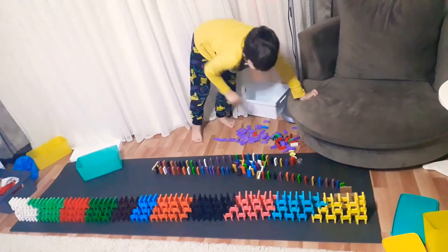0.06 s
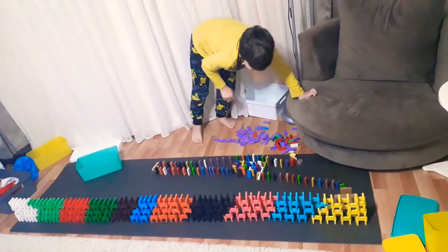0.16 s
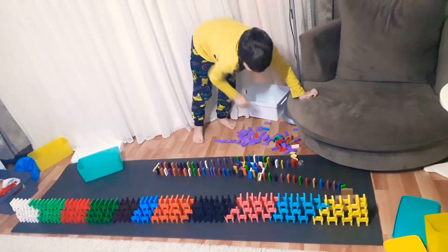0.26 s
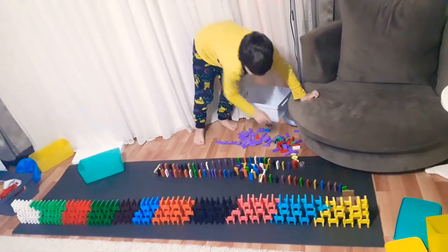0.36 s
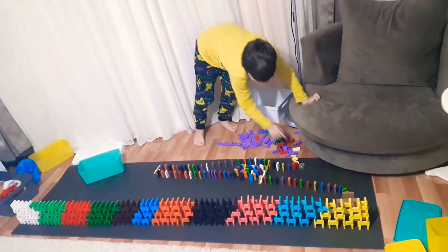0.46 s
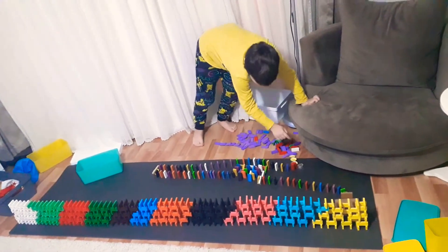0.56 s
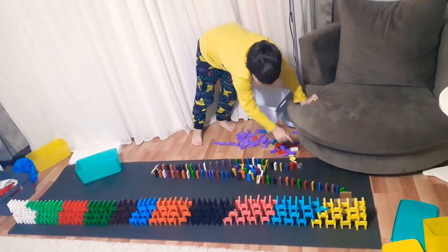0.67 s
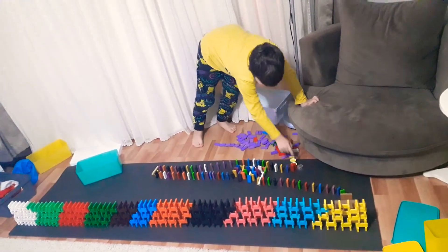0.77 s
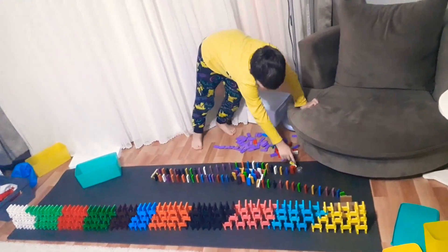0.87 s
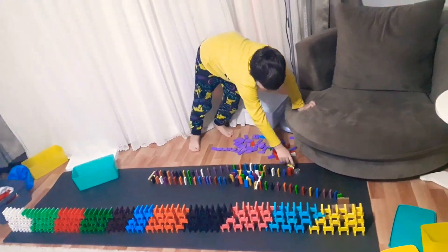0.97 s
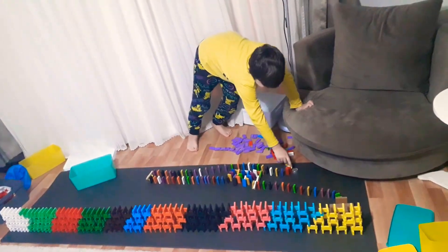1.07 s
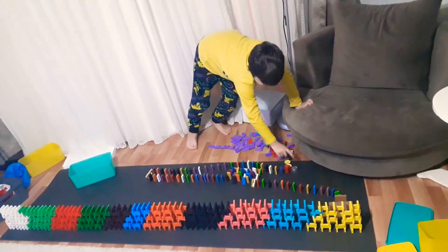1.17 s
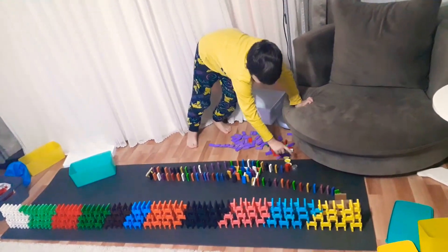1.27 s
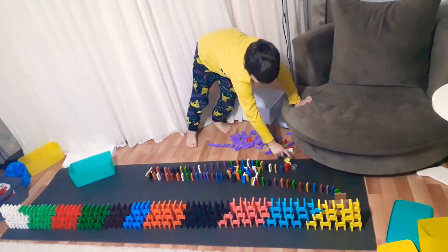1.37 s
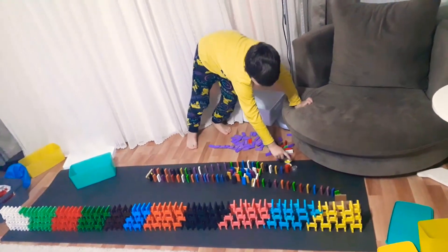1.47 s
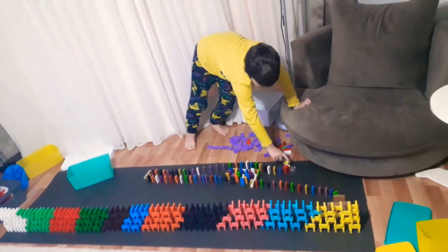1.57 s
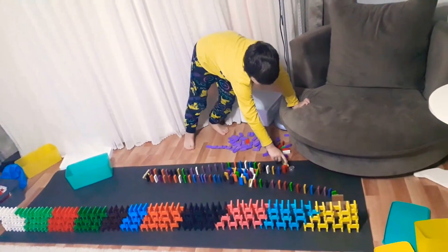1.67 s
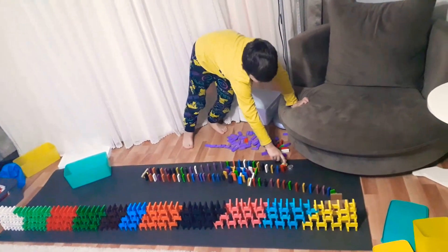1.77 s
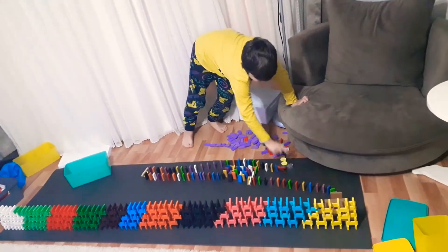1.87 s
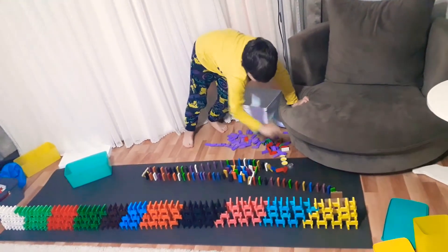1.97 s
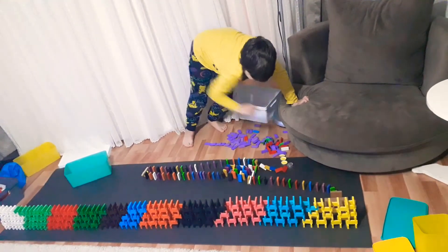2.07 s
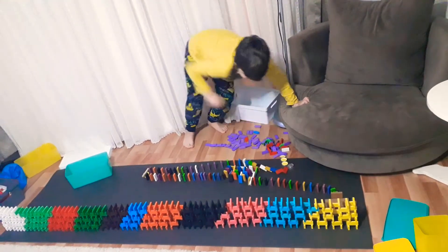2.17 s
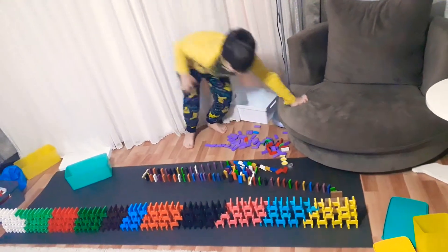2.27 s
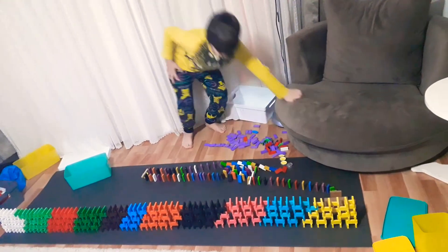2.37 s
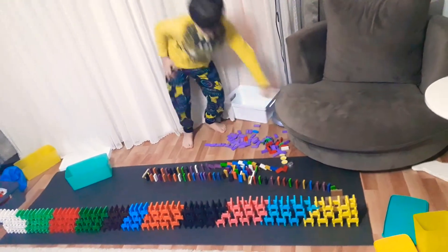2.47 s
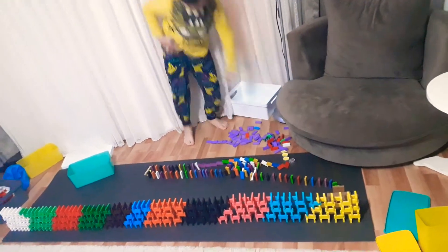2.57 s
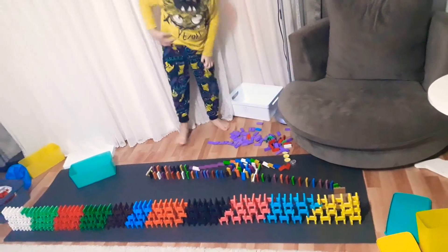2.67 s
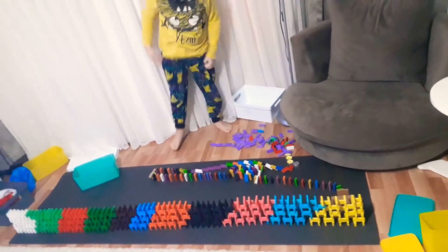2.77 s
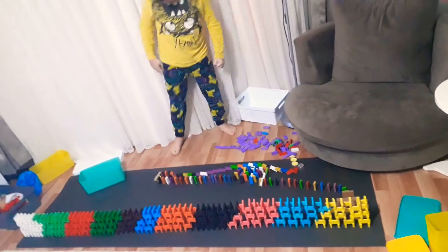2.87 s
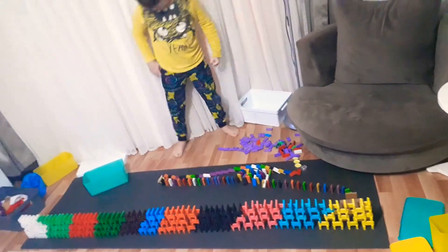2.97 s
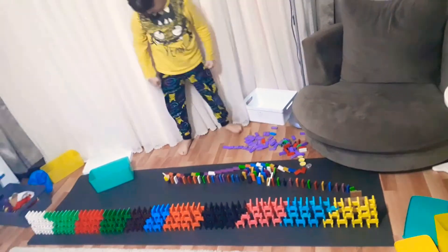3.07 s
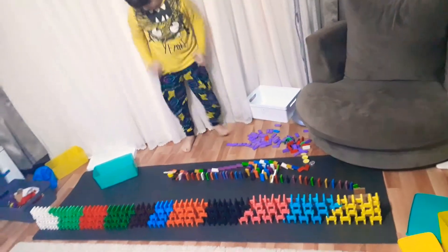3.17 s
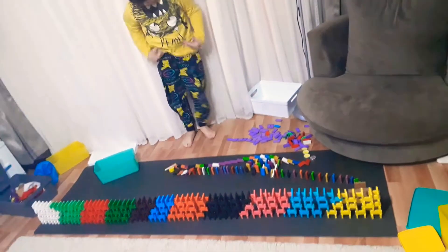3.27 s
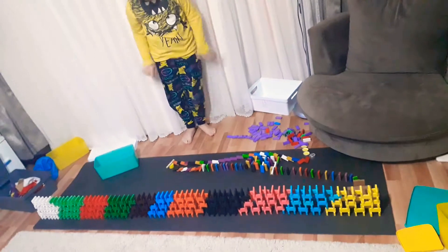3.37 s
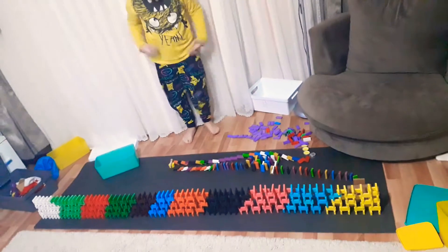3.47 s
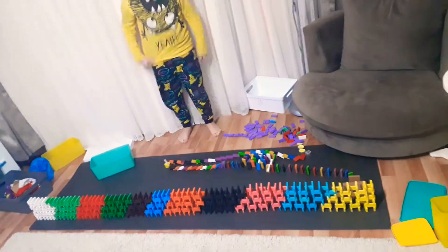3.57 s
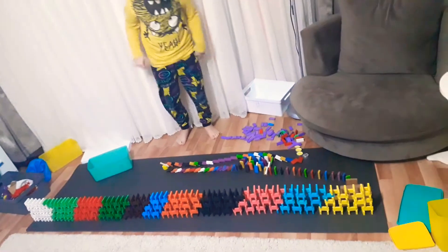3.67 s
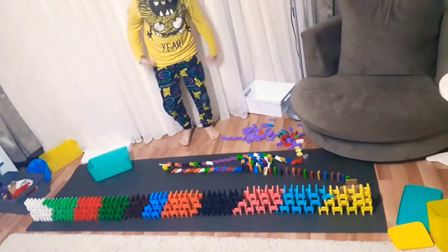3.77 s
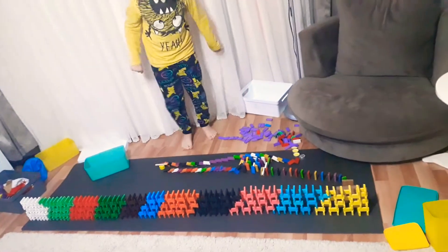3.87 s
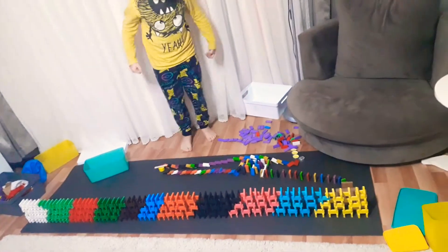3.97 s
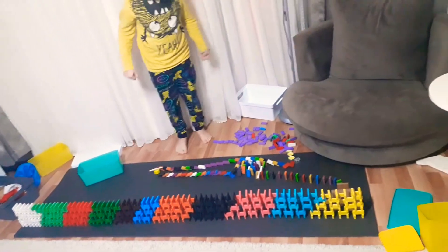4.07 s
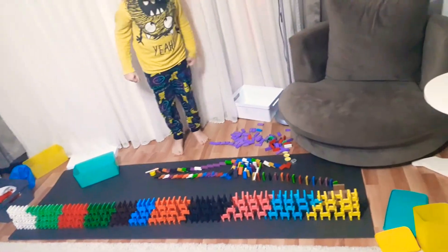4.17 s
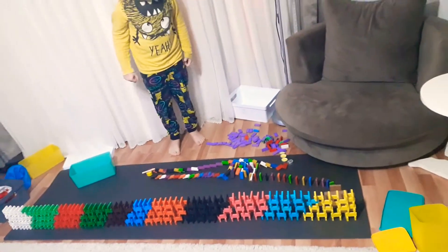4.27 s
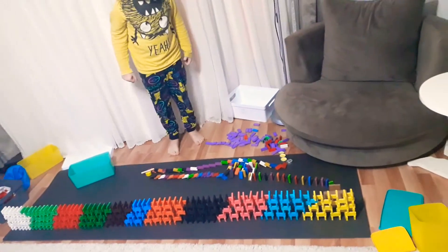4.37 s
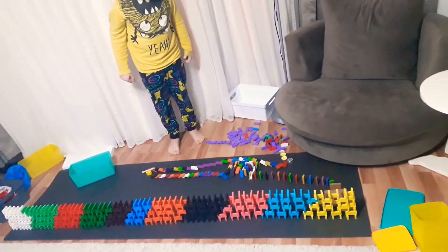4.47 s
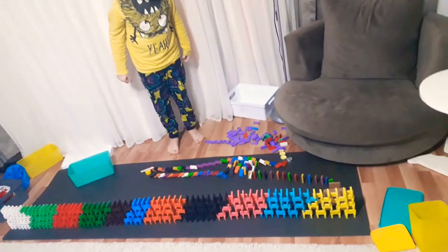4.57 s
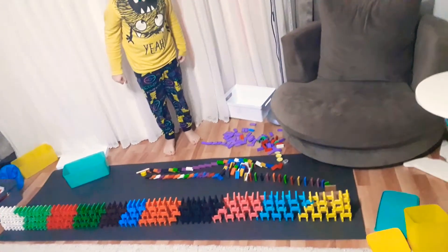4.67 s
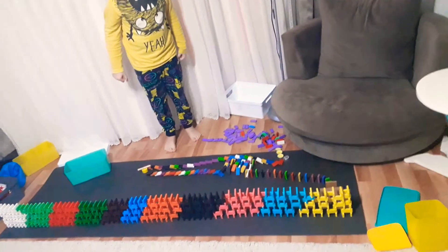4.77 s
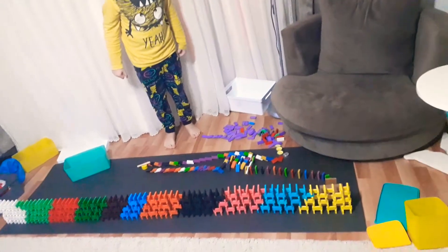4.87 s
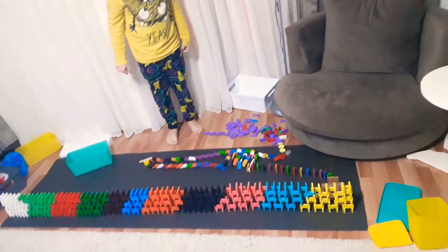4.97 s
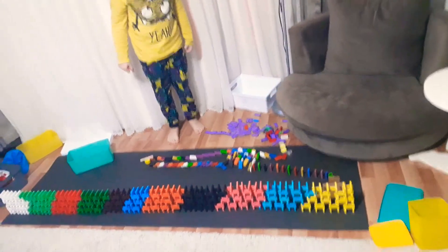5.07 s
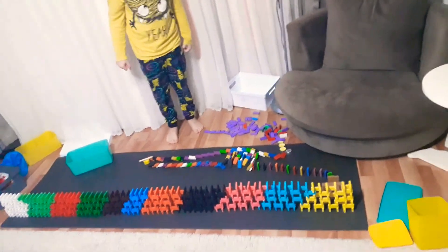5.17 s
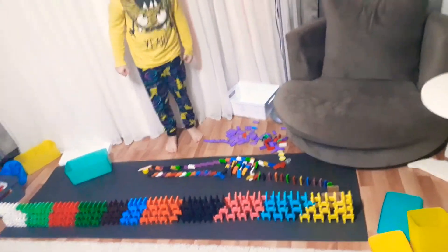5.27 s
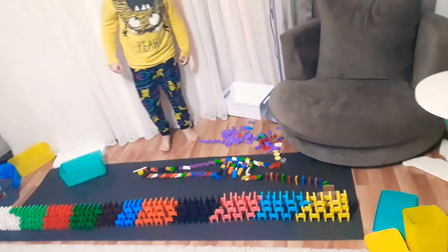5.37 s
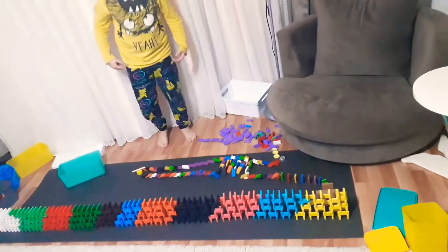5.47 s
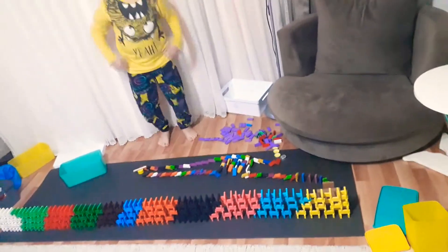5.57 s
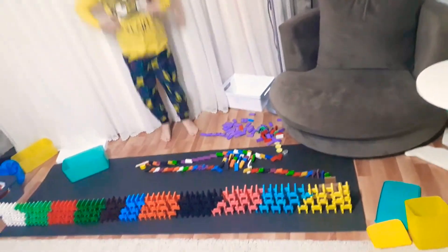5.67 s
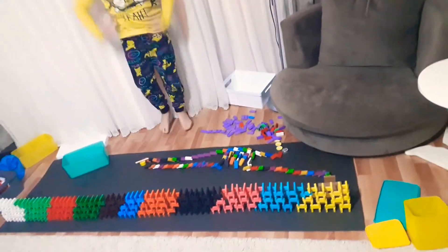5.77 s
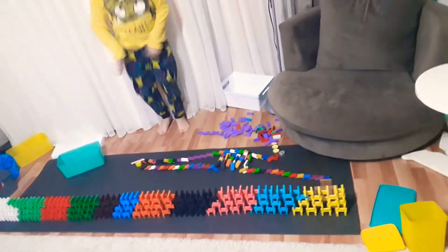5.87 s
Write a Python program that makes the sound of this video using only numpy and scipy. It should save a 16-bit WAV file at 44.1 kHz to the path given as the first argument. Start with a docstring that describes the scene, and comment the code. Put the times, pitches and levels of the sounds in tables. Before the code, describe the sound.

A long chain of small dominoes topples indoors in a quick, uneven clatter of clicks over a faint appliance whirr.

```python
"""Small dominoes on a mat on a wooden floor in a furnished room, from two microphone ports a hand apart.
An appliance whirrs from the start over a faint mains hum. A brief scuff and a few lone clicks come first.
From 2 s the chain topples: each piece clicks on the next, others rattle, some knock on the boards.
At 2.7 s something larger slaps down flat; softer slaps follow as the chain runs on to the end at 5.9 s.
The ports have a peak near 8 kHz and pass little above it."""
import sys
import numpy as np
from scipy import signal
from scipy.fft import rfft, irfft
from scipy.io import wavfile
from scipy.ndimage import uniform_filter1d

SR = 44100
rng = np.random.default_rng(int(sys.argv[2]) if len(sys.argv) > 2 else 0)


def bounce(signal):
    """Save signal as a 16-bit WAV file at the path given by the first command-line argument."""
    frames = np.transpose(np.atleast_2d(signal))
    limited = np.clip(frames, -1, 1)
    pcm = np.round(limited * 32767).astype(np.int16)
    wavfile.write(sys.argv[1], SR, pcm)


N = 260831


def amp(db):
    return 10 ** (np.asarray(db) / 20)


def unit_rms(x):
    return x / np.sqrt(np.mean(x ** 2) + 1e-20)


def at_hz(points, hz):
    """Interpolates (frequency, value) points along log frequency."""
    f, value = np.transpose(points)
    return np.interp(np.log(hz + 1), np.log(f + 1), value)


def curve(rows, column=1):
    """One column of a timed table, interpolated to every sample."""
    columns = np.transpose(rows)
    return np.interp(np.arange(N) / SR, columns[0], columns[column])


def drift(samples):
    """A smooth random wander, RMS 1."""
    return unit_rms(uniform_filter1d(uniform_filter1d(rng.standard_normal(N), samples), samples))


def add(mix, s, sound):
    part = mix[..., round(s * SR):][..., :sound.shape[-1]]
    part += sound[..., :part.shape[-1]]


def pulse(spectrum, size=1024):
    """Minimum-phase pulse with the given spectrum, peak 1."""
    hz = abs(np.fft.fftfreq(4 * size, 1 / SR))
    log_gain = np.log(amp(np.maximum(at_hz(spectrum, hz), -100)))
    x = np.fft.ifft(np.exp(np.conj(signal.hilbert(log_gain)))).real[:size]
    return x / abs(x).max()


def ring(modes, seconds, rise_s):
    """Dying sines that start together, peak 1."""
    t = np.arange(int(seconds * SR)) / SR
    x = sum(amp(db - 60 * t / t60) * np.sin(2 * np.pi * hz * t) for hz, db, t60 in modes)
    x *= 1 - np.exp(-t / rise_s)
    return x / abs(x).max()


# slow rise and fall of the background whirr's level: (time [s], level [dB])
WHIRR_LEVEL = [(0, -55), (.13, -57.5), (1, -57.5), (1.17, -54.5), (1.3, -57), (1.5, -55), (1.7, -54.5),
               (1.9, -52), (2.5, -50.5), (3.2, -50.5), (4.15, -53.5), (4.6, -54.5), (5.2, -54.5),
               (5.91, -47.5)]
# the level dips briefly: (time [s], depth [dB])
WHIRR_DIPS = [(1.53, -6.5), (1.855, -11.5)]
# broad colour of the whirr at the microphone: (frequency [Hz], relative level [dB])
WHIRR_COLOUR = [(20, -43), (45, -14), (70, -20), (98, -3), (135, -18), (220, -12), (310, -11.5), (400, -16),
                (650, -10), (976, -9), (1330, -18), (2320, -6.5), (2550, -14.5), (3530, -15.5), (6720, -4),
                (8650, -9.5), (9400, -41.5), (11000, -41), (12500, -29), (16000, -31)]
# resonances of the casing: (frequency [Hz], width [Hz], rise [dB])
CASING_PEAKS = [(578, 14, 7), (770, 32, 5.5), (938, 19, 8), (994, 18, 12.5), (1490, 30, 10.5),
                (1596, 68, 11), (1680, 37, 5.5), (2260, 22, 5), (2348, 23.5, 13.5), (2430, 27, 4.5),
                (2770, 110, 6), (3015, 95, 13.5), (3170, 18, 5.5), (3170, 22, 6), (4320, 40, 9.5),
                (5120, 33, 2), (5900, 19, 3.5), (6990, 53, 5), (6600, 66, 12.5), (7540, 14, 10.5)]
# how alike the whirr is at the two ports: (frequency [Hz], coherence [0-1])
WHIRR_COHERENCE = [(60, 0.56), (180, 1), (550, 0.21), (1650, 0.11), (4970, 0.043), (15000, 0.44)]


def appliance_whirr(right_lag_samples=19, dip_fall_s=.046, dip_rise_s=.02, flutter_db=.9):
    """Noise through the narrow resonances of a casing, gently patchy, a little louder on the right."""
    frames, hz = N // 512 + 5, np.fft.rfftfreq(2048, 1 / SR)
    a, b, c, d, patches = rng.standard_normal((frames, 1025, 5)).T
    left, unrelated = a + 1j * b, c + 1j * d
    coherence = at_hz(WHIRR_COHERENCE, hz)[:, None]
    delay = np.exp(-2j * np.pi * hz * right_lag_samples / SR)[:, None]
    right = coherence * left * delay + np.sqrt(1 - coherence ** 2) * unrelated
    peaks_db = sum(db / (1 + (2 * (hz - f) / width) ** 2) for f, width, db in CASING_PEAKS)
    colour_db = at_hz(WHIRR_COLOUR, hz) + peaks_db
    patches = unit_rms(uniform_filter1d(uniform_filter1d(patches, 20, 0), 8, 1))
    broad_patches = unit_rms(uniform_filter1d(uniform_filter1d(patches, 120, 0), 14, 1))
    spectra = np.array([amp(-1.2) * left, amp(1.2) * right])
    spectra *= amp(colour_db[:, None] + 1.8 * patches + .6 * broad_patches)
    noise = unit_rms(signal.istft(spectra, nperseg=2048, noverlap=1536)[1][:, :N])
    dips_db = sum(curve([(s - dip_fall_s, 0), (s, db), (s + dip_rise_s, 0)]) for s, db in WHIRR_DIPS)
    return amp(curve(WHIRR_LEVEL) + dips_db + flutter_db * drift(500)) * noise  # it runs unevenly


def mains_hum(hz=100.5, db=-82):
    """A faint mains tone at both ports, wavering in level and pitch."""
    waver = drift(3000)
    phase = 2 * np.pi * np.cumsum(hz + 2.6 * waver[::-1]) / SR
    return amp(db + 2.7 * waver) * np.sqrt(2) * np.sin(phase)


# pieces sliding or being handled: (time [s], level [dB], centre [Hz], width [Hz], t60 [s])
PIECE_SCUFFS = [(0.047, -47, 4530, 497, 0.02), (.43, -63, 3520, 2500, 0.18), (.517, -70, 4200, 3480, 0.14),
                (1.873, -50.5, 2300, 400, 0.31), (3.028, -36.5, 4920, 450, 0.1),
                (3.773, -41, 5150, 600, 0.039)]


def scuffs():
    """Each slide is a burst of noise in one resonance."""
    out, t = np.zeros((2, N)), np.arange(SR // 4) / SR
    noises = rng.standard_normal((len(PIECE_SCUFFS), 2, len(t)))
    for (s, db, hz, width, t60), noise in zip(PIECE_SCUFFS, noises):
        band = signal.butter(2, (hz - width / 2, hz + width / 2), "band", fs=SR, output="sos")
        envelope = amp(db - 60 * t / t60) * np.minimum(t / (.064 * t60), 1)
        add(out, s, envelope * unit_rms(signal.sosfilt(band, noise)))
    return out


# damped modes of a domino's broad face: (pitch factor [ratio], level [dB], t60 [s])
FACE_MODES = [(.55, -6, .0022), (.74, -5, .0024), (1, 0, .0034), (1.4, -6, .0018)]
# modes of its thin edge: (frequency [Hz], level [dB], t60 [s])
EDGE_MODES = [(7400, -7, .003), (7900, -2, .0035), (8300, 0, .004), (8700, -4, .0035)]
# tiny pieces make no bass; the ports pass little above their peak
CLICK_BAND = signal.cheby2(8, 45, (600, 9800), "band", fs=SR, output="sos")


def click(hz, edge_db, sizzle_db, detune, tick, sizzle):
    """Piece strikes piece: a bare tick, the damped face, the ring of the edge and a bright sizzle."""
    face_modes = [(hz * k * (1 + .081 * d), db, t60) for (k, db, t60), d in zip(FACE_MODES, detune[::-1])]
    edge_modes = [(f * (1 + .02 * d), db, t60) for (f, db, t60), d in zip(EDGE_MODES, detune)]
    face = amp(-4) * ring(face_modes, seconds=.02, rise_s=.0001)
    edge = amp(edge_db) * ring(edge_modes, seconds=.02, rise_s=.0008)
    tick_db = 5 + 9 * np.log2(hz / 4000)  # softer contacts ring lower and tick less
    return signal.sosfilt(CLICK_BAND, face + amp(tick_db) * tick + edge) + amp(sizzle_db) * sizzle


# clicks along the chain, with a few close echoes of the loud ones:
# (time [s], level [dB], face pitch [Hz], edge ring over the level [dB])
CHAIN_CLICKS = [(0.4316, -53, 3300, -25), (0.5187, -43, 4000, -16), (0.5928, -51, 4870, -33),
                (1.2088, -40.5, 2330, 0), (1.8755, -59, 2280, -4), (1.9936, -28.5, 3160, -8),
                (2.033, -20.5, 2900, -11), (2.0724, -26.5, 4900, 7), (2.112, -20.5, 3160, -4.5),
                (2.1503, -21.5, 3800, 0), (2.19, -27.5, 4770, 7.5), (2.2074, -38, 5140, 18),
                (2.2265, -22, 3100, -20), (2.3189, -26, 3160, -11), (2.372, -25, 3000, -16),
                (2.4205, -21.5, 2260, -18), (2.4756, -23.5, 3150, -19), (2.5274, -22, 3550, -4),
                (2.578, -21.5, 4620, 4), (2.7334, -23, 5100, 16.5), (2.7524, -32.5, 4830, 10.5),
                (2.7607, -25, 2630, 12), (2.7807, -55, 4800, 5), (2.788, -48, 4800, 16),
                (2.8026, -42, 4830, 26), (2.8287, -27, 5400, 13.5), (2.836, -33, 4200, -5),
                (2.84, -40.5, 5900, 27), (2.847, -48, 4080, 19), (2.8612, -33, 4800, -11),
                (2.8941, -25.5, 4570, 4.5), (2.9277, -29.5, 5500, 7.5), (2.9608, -24, 4770, 0),
                (3.0008, -31, 2300, -6), (3.023, -28.5, 3400, -1), (3.03, -35, 5000, 4),
                (3.1475, -33, 2440, -12), (3.2088, -27.5, 3460, -3), (3.256, -29.5, 4900, 3),
                (3.3006, -26, 4830, -2), (3.3486, -23, 2320, -8), (3.3861, -20.5, 3530, 0.5),
                (3.361, -36, 2320, -12), (3.4591, -30, 2630, -12), (3.495, -35.5, 5670, -15),
                (3.5005, -34, 3400, 8), (3.52, -43.5, 4600, 14.5), (3.54, -26.5, 4600, 6),
                (3.5763, -32.5, 4430, 20.5), (3.594, -43, 4630, 21.5), (3.622, -40, 2660, -19),
                (3.632, -34, 5340, 12), (3.658, -27.5, 4800, 7.5), (3.7016, -35, 5260, -6),
                (3.7665, -26, 3140, -11), (3.8016, -26, 3230, -9), (3.8394, -25, 2350, -6),
                (3.8849, -21.5, 3220, -11), (3.928, -21.5, 2840, -9), (3.935, -23.5, 5180, 8.5),
                (3.9559, -23.5, 3150, -14), (4.1979, -32, 3100, -2), (4.268, -24.5, 2140, -16),
                (4.2709, -21.5, 3000, -17), (4.326, -16.5, 3170, -3), (4.332, -20.5, 1980, -15),
                (4.3357, -28, 2860, -16), (4.599, -31, 2030, -5), (4.73, -29, 2740, -25),
                (4.779, -34, 3270, -26), (4.816, -27, 3320, -7), (4.8371, -32.5, 5150, 2),
                (4.8408, -18, 2770, -8), (4.8593, -25.5, 2110, -30), (4.879, -30, 1910, -25),
                (4.9002, -27, 1830, -18), (4.9433, -29, 2940, -14), (5.291, -31, 5240, 6),
                (5.3541, -28, 5250, 10.5), (5.406, -23, 3700, -7), (5.439, -49, 4460, -11),
                (5.4523, -22.5, 4700, 5.5), (5.4889, -27, 4300, -21), (5.5333, -25.5, 4700, 0),
                (5.5794, -23, 4170, -1), (5.6239, -23, 4600, -1.5), (5.664, -26.5, 4940, -10),
                (5.7053, -18.5, 3440, 9), (5.7108, -21.5, 4600, 8.5), (5.7175, -36, 4500, 8),
                (5.74, -29, 4700, -4), (5.8545, -30.5, 5200, 4)]
# how each place on the mat sounds at the ports: (time [s], sizzle over the level [dB], left-right [dB])
CHAIN_PLACES = [(0.5, -50, -16), (1.2, -14, 1), (2.0, -28, 1), (2.22, -20.5, -1.5), (2.45, -33, 4),
                (2.8, -9.5, 1.5), (3.3, -24.5, 0), (3.6, -6, 2), (3.85, -29.5, 2), (3.95, -5.5, 0),
                (4.2, -24.5, -2.5), (4.9, -26, 0.5), (5.5, -26, 3), (5.9, -12, -1)]
# colour of the sizzle: (frequency [Hz], relative level [dB])
SIZZLE_COLOUR = [(8000, -61), (9800, -15.5), (11500, -21.5), (13000, -26.5), (14500, -36), (16000, -18.5)]


def chain_clicks(tick):
    """The clear clicks and a few close echoes; sizzle and side change along the mat."""
    out, t = np.zeros((2, N)), np.arange(len(tick)) / SR
    bursts = rng.standard_normal((len(CHAIN_CLICKS), len(t))) * amp(-60 * t / .02)
    chances = rng.standard_normal((len(CHAIN_CLICKS), 12))
    sizzle_db, pan_db = curve(CHAIN_PLACES), curve(CHAIN_PLACES, column=2)
    for (s, db, hz, edge_db), burst, chance in zip(CHAIN_CLICKS, bursts, chances):
        at = round(s * SR)
        detune, shifts, stray_db = chance[:4], chance[4:11], 4 * chance[11]
        sizzle = np.convolve(burst, pulse(SIZZLE_COLOUR, size=256))[:len(t)]
        sound = click(hz, edge_db, sizzle_db[at], detune, tick, sizzle / abs(sizzle).max())
        sides_db = np.array([[.5], [-.5]]) * (pan_db[at] + stray_db)
        add(out, s + .0004, amp(db + sides_db) * at_ports(sound, shifts, early_db=-3))
    return out


# pieces settling on the mat: (time [s], level [dB])
RATTLE_LEVEL = [(1.8, -83), (1.94, -54.5), (2.55, -56.5), (2.77, -45.5), (2.95, -51), (3.1, -56.5),
                (3.19, -64), (3.29, -52), (3.42, -46), (3.6, -47), (3.72, -52.5), (3.84, -52),
                (3.97, -62.5), (4.63, -61), (4.79, -53.5), (4.98, -63), (5.27, -90), (5.31, -64),
                (5.36, -52.5), (5.76, -57.5), (5.91, -52)]


def settling_rattle(tick, clicks_per_s=350, kinds=16):
    """Settling pieces make a thin rattle of small clicks at random times."""
    strength = amp(3.5 * np.minimum(rng.exponential(1, N), 4))
    blows = strength * (rng.random(N) < clicks_per_s / SR)
    kind, rattle = rng.integers(0, kinds, N), np.zeros((2, N))
    for k, chance in enumerate(rng.random((kinds, 12))):
        hz, detune, shifts = 2000 + 3000 * chance[0], 2 * chance[1:5] - 1, 4 * chance[5:] - 2
        sound = click(hz, edge_db=-2.5, sizzle_db=-65, detune=detune, tick=tick, sizzle=tick)
        heard = at_ports(sound, shifts, early_db=-.3)
        rattle += signal.oaconvolve((blows * (kind == k))[None], heard, axes=1)[:, :N]
    started = np.arange(N) > RATTLE_LEVEL[0][0] * SR
    return amp(curve(RATTLE_LEVEL)) * started * unit_rms(rattle)


# colour of the bare contact: (frequency [Hz], relative level [dB])
TICK_COLOUR = [(600, -16.5), (1400, 3), (2000, 8), (4500, 7.5), (6000, 8), (8300, 11), (9500, -66.5),
               (16000, 8.5)]
# microphone colour, applied to the clicks and rattle: (frequency [Hz], gain [dB])
MICROPHONE_COLOUR = [(1500, -6.5), (2000, -1), (3000, 0), (3700, -0.5), (4500, 2), (5100, 3.5), (6000, 5.5),
                     (7000, -2.5)]


def dominoes():
    """The clicks and the rattle, coloured by the microphone."""
    tick = pulse(TICK_COLOUR, size=SR // 50)
    clatter = chain_clicks(tick) + settling_rattle(tick)
    return irfft(rfft(clatter) * amp(at_hz(MICROPHONE_COLOUR, np.fft.rfftfreq(N, 1 / SR))), N)


# dull knocks on the floor: (time [s], level [dB], pitch the spot favours [Hz])
FLOOR_KNOCKS = [(2.044, -46, 242), (2.07, -50, 239), (2.12, -58, 247), (2.29, -53, 385), (2.33, -53.5, 346),
                (3.087, -56.5, 133), (3.119, -44, 504), (3.344, -49, 464), (3.573, -46.5, 453),
                (3.61, -46, 407), (3.839, -37, 426), (3.884, -51, 443), (3.927, -47, 375),
                (3.983, -41, 346), (4.331, -36, 450), (4.364, -39.5, 350), (4.385, -49, 327),
                (4.421, -56, 307), (4.455, -55, 313), (4.79, -58, 446), (4.834, -51, 400),
                (4.897, -44, 335), (4.944, -40, 338), (4.975, -55, 308), (5.454, -50, 367),
                (5.525, -45.5, 380), (5.662, -44, 340), (5.859, -38.5, 557), (5.894, -41, 151)]
# modes of the floorboards: (frequency [Hz], level [dB], t60 [s])
BOARD_MODES = [(86.4, -12, 0.16), (164, 1, 0.08), (240, -6, 0.08), (312, -1, 0.055), (350, -5, 0.05),
               (390, -2, 0.06), (446.2, 3, 0.055), (500, -10, 0.034), (660, -11, 0.029), (990, -6, 0.023)]


def floor_knocks(landing_db=-34, landing_hz=330, board_spread=.035):
    """Knocks ring the boards, each tuned a little differently; modes near the spot's pitch win."""
    out = np.zeros((2, N))
    # every toppled piece also thumps the boards faintly through the mat
    spots_hz = landing_hz * 2 ** rng.uniform(-.61, 1, len(CHAIN_CLICKS))
    blows = FLOOR_KNOCKS + [(s, db + landing_db, hz) for (s, db, *_), hz in zip(CHAIN_CLICKS, spots_hz)]
    for (s, db, spot_hz), chance in zip(blows, rng.standard_normal((len(blows), 7 + len(BOARD_MODES)))):
        shifts, detune = chance[:7], chance[7:]
        modes = [(hz * (1 + board_spread * d), mode_db - 7.7 * abs(np.log2(hz / spot_hz)), t60)
                 for (hz, mode_db, t60), d in zip(BOARD_MODES, detune)]
        knock = ring(modes, seconds=.28, rise_s=.0025)
        add(out, s, amp(db) * at_ports(knock, shifts, early_db=-.089))
    return out


# something larger landing flat, nearer the middle between the ports: (time [s], level [dB])
FLAT_LANDINGS = [(2.6549, -20), (3.12, -42.5), (5.525, -40), (5.863, -38)]
# colour of a slap: (frequency [Hz], relative level [dB])
SLAP_COLOUR = [(150, -40), (350, -21), (700, -7), (1100, -4), (1500, -8), (2000, -3), (2900, -16),
               (3700, -28), (5000, -24), (9000, -50)]


def slaps(chatter_t60_s=.075):
    """A larger object lands on two edges in quick turn and chatters as it settles."""
    out, t = np.zeros((2, N)), np.arange(SR // 15) / SR
    for (s, db), shifts in zip(FLAT_LANDINGS, rng.standard_normal((len(FLAT_LANDINGS), 7))):
        force = amp(-19 - 60 * t / chatter_t60_s) * rng.standard_normal(len(t))
        force[[35, 100]] += 1  # the two edges
        slap = np.convolve(force, pulse(SLAP_COLOUR))
        add(out, s, amp(db) * at_ports(slap, shifts, early_db=-12.5, right_lag_samples=4))
    return out


# first reflections at the left and right port: (delay [s], level [dB], level above 6.5 kHz [dB])
LEFT_REFLECTIONS = [(.003, -8.5, -2), (.006, -4.5, -23), (.0096, -3, 3.5), (.0125, -14.5, -15),
                    (.019, -18, -1.5), (.028, -9.5, -26), (.035, -26, -7.5)]
RIGHT_REFLECTIONS = [(.003, -6.5, -11), (.006, -7, 1.5), (.0097, 1.5, -8), (0.0123, -6.5, 2),
                     (0.0171, -5.5, -4), (.026, -43, -22), (.036, -2, -44)]
TREBLE_SPLIT = signal.firwin(41, 6500, pass_zero=False, fs=SR)[None]


def at_ports(sound, shifts, early_db, right_lag_samples=11):
    """The direct sound at both ports and its first reflections, whose delays shift with the spot."""
    taps, treble = np.zeros((2, 2, SR // 20))
    lag = round(np.clip(right_lag_samples + .8 * shifts[0], 0, 20))
    taps[0, 0] = taps[1, lag] = 1
    for port, reflections in enumerate((LEFT_REFLECTIONS, RIGHT_REFLECTIONS)):
        for (s, db, treble_db), shift in zip(reflections, shifts):
            at = round(s * (1 + .025 * shift) * SR)
            taps[port, at] = amp(db + early_db)
            treble[port, at] = amp(treble_db + early_db) - taps[port, at]
    taps += signal.fftconvolve(treble, TREBLE_SPLIT, "same", axes=1)
    return signal.fftconvolve(sound * np.ones((2, 1)), taps, axes=1)


# main decay of the furnished room: (frequency [Hz], t60 [s])
ROOM_DECAY = [(200, 0.57), (1000, 0.27), (3000, 0.11), (8000, 0.098), (14000, 0.033)]


def room(x, tail_db, rise_s=.007):
    """Adds the diffuse tail scattered by the furniture: sparse echoes, each band dying at its own speed."""
    size = SR // 2
    taps = np.zeros((2, size))
    grid = np.arange(40, size - 20, 20)
    at = grid + rng.integers(0, 20, (2, len(grid)))
    np.put_along_axis(taps, at, rng.choice([-1., 1.], at.shape), 1)
    hz, t, spectra = signal.stft(taps, SR, nperseg=256)
    fall = amp(-60 * t / at_hz(ROOM_DECAY, hz)[:, None])
    fall += amp(-9 - 60 * t / .43)  # a weaker decay common to all bands
    tail = signal.istft(spectra * fall, SR, nperseg=256)[1][:, :size]
    tail *= 1 - np.exp(-np.arange(size) / SR / rise_s)
    return x + signal.fftconvolve(x, tail * amp(tail_db) / np.linalg.norm(tail[0]), axes=1)[:, :N]


def scene():
    """The room as heard from the microphone position."""
    left, right = room(floor_knocks(), tail_db=-10)
    # long waves from the floor reach both ports almost alike
    floor = (left + right) / 2 + amp(-15) * (left - right) * np.array([[1], [-1]])
    pieces = room(dominoes() + scuffs(), tail_db=-4)  # clicks and scuffs with a short, clear room tail
    return pieces + floor + room(slaps(), tail_db=-8.5) + appliance_whirr() + mains_hum()


# the two ports differ in colour: (frequency [Hz], left-right [dB])
PORT_BALANCE = [(60, 6), (150, -1), (380, 3.5), (950, 1.5), (2380, -1), (5980, -2), (15000, 6.5)]


def record(dry):
    """The microphone: port colours, a bass roll-off at 70 Hz and a band limit at 16 kHz."""
    lean_db = at_hz(PORT_BALANCE, np.fft.rfftfreq(N, 1 / SR)) / 2
    ports = irfft(rfft(dry) * amp([lean_db, -lean_db]), N)
    ports = signal.sosfilt(signal.butter(2, 70, "high", fs=SR, output="sos"), ports)
    return signal.oaconvolve(ports, signal.firwin(511, 16000, window=("kaiser", 9), fs=SR)[None], "same")


dry = scene()
out = record(dry)
bounce(out)
```